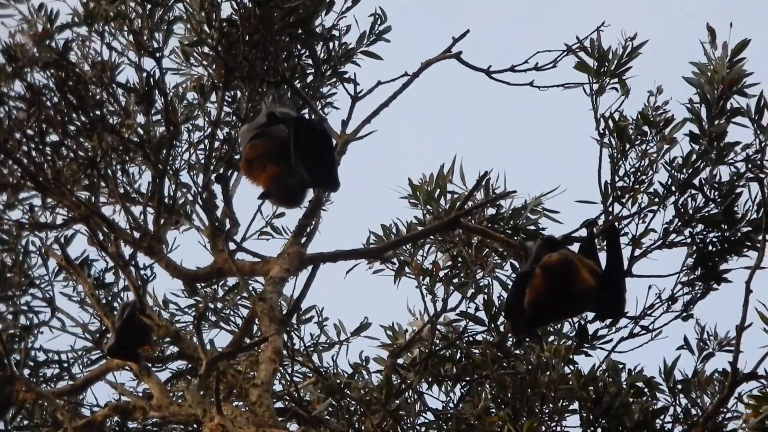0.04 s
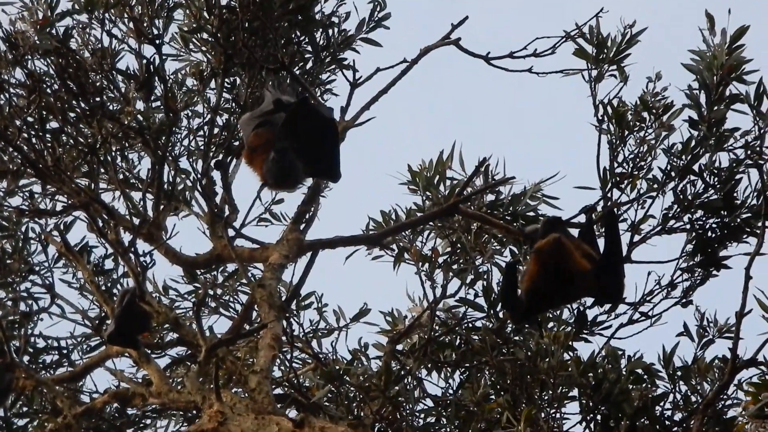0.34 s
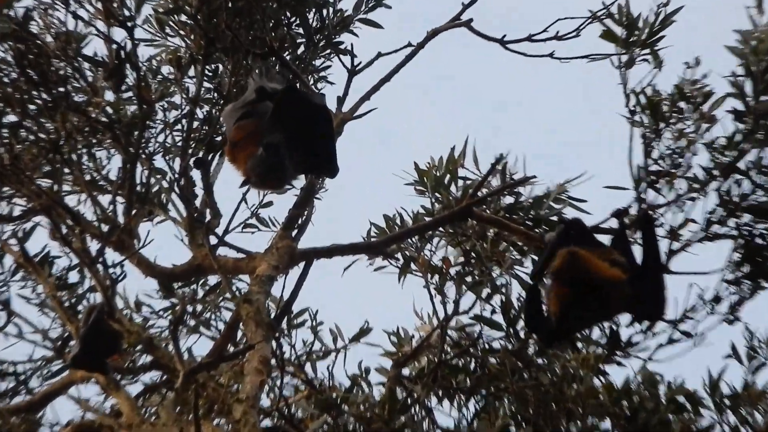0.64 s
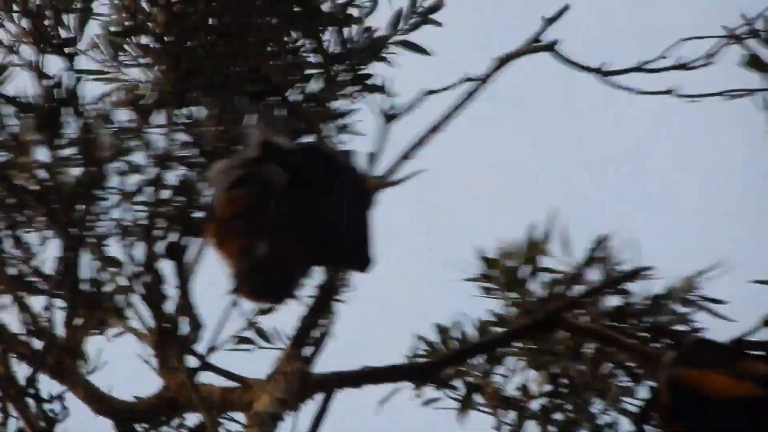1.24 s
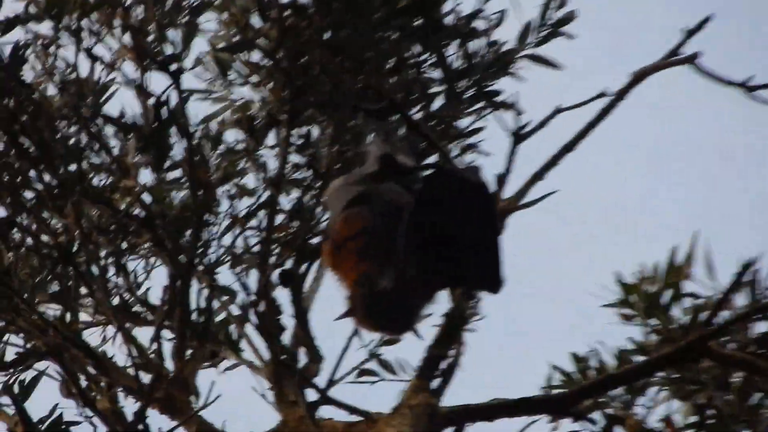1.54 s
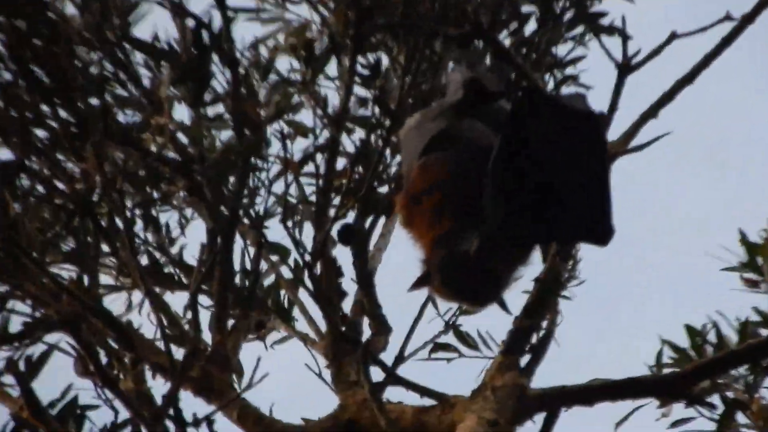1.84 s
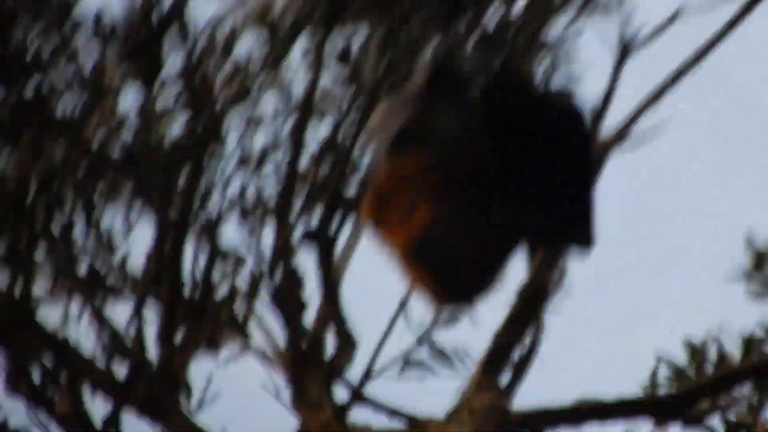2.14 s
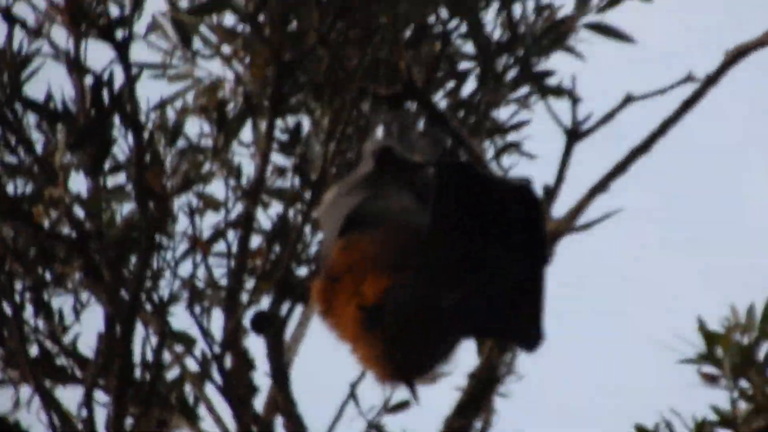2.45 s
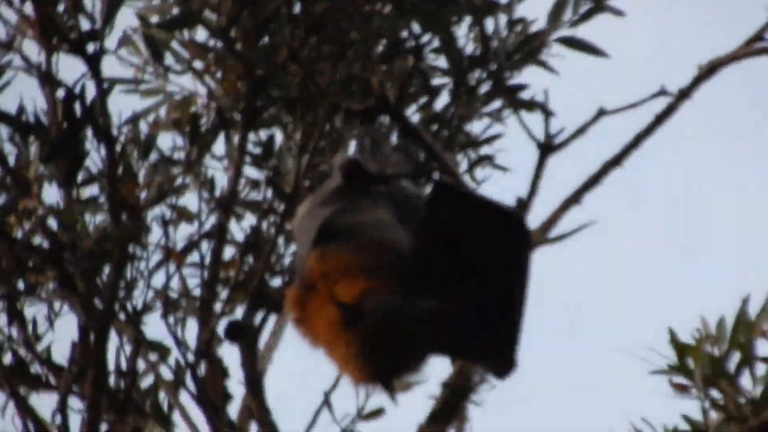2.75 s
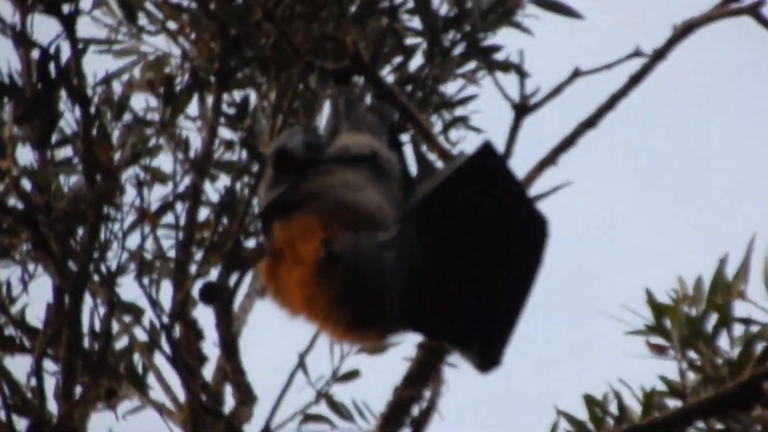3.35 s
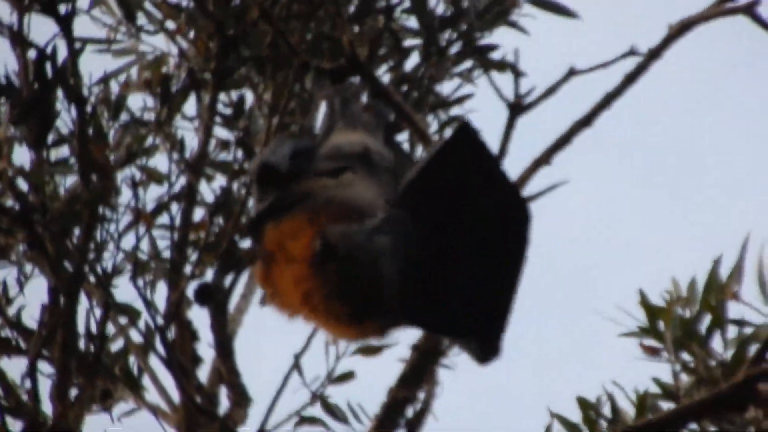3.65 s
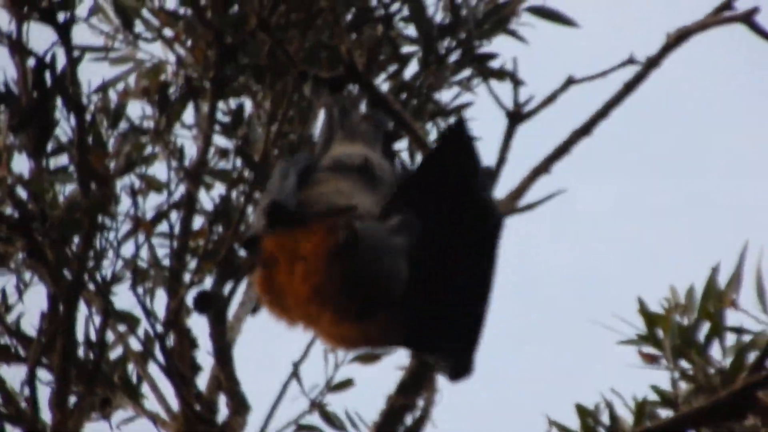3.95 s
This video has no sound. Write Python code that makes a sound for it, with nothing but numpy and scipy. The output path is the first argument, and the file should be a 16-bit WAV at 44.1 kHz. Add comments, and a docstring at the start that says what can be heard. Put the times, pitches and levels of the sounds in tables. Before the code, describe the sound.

Fruit bats squabble in a tree with short, throaty squawks and rasps, then runs of thin rising chirps. A camera clicks sharply twice at the microphone, while faint birds whistle over a low outdoor rumble and steady hiss.

```python
"""Fruit bats squabbling in a tree

Arched, throaty squawks trade with short rasps, then come runs of thin rising chirps.
Birds whistle and trill far off, and the foliage scatters every call.
The camera clicks twice, ringing its shell, and fingers bump it softly.
Underneath sit a low outdoor rumble, a wash of distant calls and a steady high hiss."""
import sys
import numpy as np
from scipy import signal
from scipy.fft import rfft, irfft
from scipy.io import wavfile
from scipy.ndimage import uniform_filter1d

SR = 44100
rng = np.random.default_rng(int(sys.argv[2]) if len(sys.argv) > 2 else 0)


def unload_wav(signal):
    """Save mono or channel-first audio to the path in sys.argv[1] as 16-bit WAV at rate SR, clipped to [-1, 1]."""
    wavfile.write(
        sys.argv[1],
        SR,
        np.round(np.clip(np.atleast_2d(signal).T, -1, 1) * 32767).astype(np.int16),
    )


N = 176400
T = np.arange(N) / SR

# One curve per squawk: (time [s], pitch [Hz], level [dB], roughness [0-1], throat resonance [Hz])
SQUAWKS = [
    [(1.008, 540, -41, .4, 3200), (1.026, 570, -35.5, .15, 2900), (1.047, 550, -37, .2, 2850),
     (1.074, 540, -45, .3, 3100)],
    [(1.157, 420, -36, .6, 3000), (1.172, 497, -32.5, .1, 2950), (1.184, 492, -34, .25, 2850),
     (1.198, 543, -28, .08, 3200), (1.21, 530, -28, .12, 3150), (1.223, 480, -36, .2, 2900)],
    [(1.307, 425, -35.5, .45, 2800), (1.318, 485, -33, .12, 2900), (1.331, 535, -26.5, .08, 3150),
     (1.346, 541, -24.8, .1, 3270), (1.353, 536, -26.5, .15, 3480), (1.363, 505, -29.5, .3, 3330),
     (1.374, 478, -37, .35, 2950)],
    [(1.453, 425, -41, .25, 2600), (1.462, 455, -33.5, .2, 2730), (1.471, 500, -34.5, .15, 3000),
     (1.484, 534, -29, .2, 3400), (1.499, 540, -28, .5, 3500), (1.511, 490, -36, .6, 3100)],
]
# Rasps between the squawks: (start [s], length [s], peak pitch [Hz], peak level [dB])
RASPS = [(1.091, 0.011, 480, -36.5), (1.108, 0.019, 495, -38), (1.257, 0.0073, 503, -33.5),
         (1.265, 0.01, 507, -34), (1.398, 0.031, 524, -34), (1.594, 0.01, 550, -34.5),
         (1.677, 0.047, 474, -44)]
def bats(rasp_roughness=.36, rasp_arch=.06):
    """The squabble: squawks and rough little rasps, each arching in pitch and level."""
    jitter = drift(330)
    breaths = [colour(rng.standard_normal(N), throat) for throat in (THROAT_OPEN, THROAT_CLOSED)]
    rasps = []
    for start, length, hz, db in RASPS:
        rasps.append([(start + length * u, hz * (1 - rasp_arch * sag), db - 4 * sag,
                       rasp_roughness, 6 * hz) for u, sag in ((0, 1), (.5, 0), (1, .75))])
    return sum(bat_call(curve, jitter, breaths) for curve in SQUAWKS + rasps)


# Throat tone with the mouth wide open: (frequency [Hz], gain [dB])
THROAT_OPEN = [(1400, -40.5), (2130, -13), (2600, -13.5), (2980, -1), (3200, 2), (3450, 3), (3750, -7.5),
               (4250, -4), (4800, -18), (6500, -32), (13000, -52)]
# Throat tone with the mouth half closed: (frequency [Hz], gain [dB])
THROAT_CLOSED = [(1400, -28), (2400, -14), (2850, -9), (3200, 1), (3600, -10.5), (4300, -11), (4800, -10.5),
                 (5400, -11.5), (6400, -20), (13000, -48)]
CLOSED_DB, OPEN_DB = -37, -31.5   # call levels between which the mouth opens
JITTER_DEPTH, BREATH_MIX = .07, .65   # at full roughness
def bat_call(curve, jitter, breaths, throat_hz=3200, grain_db=3, edge_s=.005):
    """Jittered harmonics and pulsed breath; the mouth opens as the call grows louder."""
    times, *columns = np.transpose(curve)
    span = (T > times[0] - edge_s) & (T < times[-1] + edge_s)
    t = T[span]
    pitch, level, rough, resonance = (np.interp(t, times, column) for column in columns)
    mouth = np.clip((level - CLOSED_DB) / (OPEN_DB - CLOSED_DB), 0, 1)
    phase = 2 * np.pi * np.cumsum(pitch * (1 + JITTER_DEPTH * rough * jitter[span])) / SR
    harmonic = np.arange(2, 22)[:, None]
    grain = unit(uniform_filter1d(rng.standard_normal((len(harmonic), len(t))), size=400, axis=1))
    place = harmonic * pitch * throat_hz / resonance   # slides the throat's peak to the resonance
    throat_db = mouth * at_hz(THROAT_OPEN, place) + (1.5 - mouth) * at_hz(THROAT_CLOSED, place)
    gains = amp(throat_db + grain_db * grain)
    lag = .65 * harmonic ** 2 + rng.normal(0, .25, harmonic.shape)   # smears each pulse into an upsweep
    voice = (gains * np.cos(harmonic * phase - lag)).sum(0) / np.sqrt((gains ** 2).sum(0) / 2)
    breath = mouth * breaths[0][span] + (1 - mouth) * breaths[1][span]
    air = unit(breath * (1 + .5 * np.cos(phase)))
    gate = np.clip(np.minimum(t - t[0], t[-1] - t) / edge_s / 2 + .5, 0, 1)
    out = np.zeros(N)
    out[span] = unit(voice + BREATH_MIX * rough * air) * gate * amp(level)
    return out


# Runs of chirps: (start [s], starting pitch [Hz], level [dB], overtones and air [dB])
CHIRPS = [(2.596, 4920, -49, -15), (2.643, 4800, -43, -8), (2.692, 4830, -40, -2),
          (2.743, 4550, -37, -13.5), (2.868, 3555, -38, -5), (2.903, 4370, -39.5, -5),
          (2.948, 4076, -32.5, -7), (2.998, 4290, -35, -6.5), (3.046, 4170, -32, -8),
          (3.22, 3494, -46.5, 2), (3.264, 3880, -41, -1), (3.309, 4360, -35.5, -10),
          (3.361, 4344, -33, -15), (3.42, 4430, -36.5, -13), (3.579, 3480, -44.5, -13),
          (3.621, 4140, -41, -7), (3.672, 4320, -36, -8), (3.722, 4297, -32.5, -9.5),
          (3.776, 4050, -37.5, -25)]
# Scratch of air in a chirp: (frequency [Hz], gain [dB])
SCRATCH = [(1500, -25), (2600, -9.5), (3400, -12), (5000, 5), (6300, -10), (8500, 7.5), (11500, 2),
           (14000, -16)]
def chirps(length_s=.033, attack_s=.009, glide_s=.026, waver_depth=.014, rasp_depth=.6, rasp_hz=450):
    """Quick raspy upward sweeps with two overtones, levelling off towards a top pitch."""
    out, t = np.zeros(N), T[:int(length_s * SR)]
    envelope = np.minimum(t / attack_s, (length_s - t) / (length_s - attack_s))
    waver = drift(530)
    air = amp(-1) * colour(rng.standard_normal(N), SCRATCH)
    lowpass = signal.butter(4, rasp_hz, fs=SR, output="sos")
    rasp = unit(signal.sosfilt(lowpass, rng.standard_normal(N)))
    for start, hz, db, overtone_db in CHIRPS:
        span = slice(int(start * SR), int(start * SR) + len(t))
        top_hz = np.interp(hz, [3485, 4120], [4470, 6200])   # the low chirp opening a run rises less
        pitch = top_hz + (hz - top_hz) * np.exp(-t / glide_s)
        phase = 2 * np.pi * np.cumsum(pitch * (1 + waver_depth * waver[span])) / SR
        edge = np.sin(2 * phase) + amp(-11) * np.sin(3 * phase) + air[span]
        tone = np.sin(phase) + amp(overtone_db) * edge
        add(out, start, amp(db) * envelope * np.sqrt(2) * tone * unit(1 + rasp_depth * rasp[span]))
    return out


# Camera clicks: (time [s], level [dB], snap left over right [dB], shell ring [dB])
CLICKS = [(1.0076, -14, 4, -0.5), (1.915, -9.5, -6.5, -0.5)]
# Contacts within a click: (time offset [s], level [dB])
CONTACTS = [(-.0019, -6.5), (-.0009, -12), (0, -1.5), (.0009, -10.5)]
# Bright snap of a contact: (frequency [Hz], gain [dB])
SNAP = [(500, -26), (2000, -5), (5000, -17.5), (7700, 6), (11000, -7), (15500, -18)]
# Modes of the shell: (frequency [Hz], level [dB], 60 dB decay time [s])
SHELL_MODES = [(950, -15, 0.017), (1500, -46, 0.011), (2350, -19, 0.025), (3240, -17.5, 0.015),
               (5400, -26, 0.0076), (7300, -33, 0.0056), (7300, -35, .006), (10500, -26, .005)]
def camera_clicks(snap_db=-1, snap_decay_s=.00062, shell_pan_db=2):
    """Four quick contacts snap; the main one rings the camera's shell."""
    out, t = np.zeros((2, N)), T[:SR // 20]
    ring = sum(amp(db - 60 * t / t60) * np.sin(2 * np.pi * hz * t) for hz, db, t60 in SHELL_MODES)
    for start, db, pan_db, ring_db in CLICKS:
        for offset, contact_db in CONTACTS:
            noise = widen(*rng.standard_normal((2, len(t))), side_db=-7)
            snap = colour(noise, SNAP) * np.exp(-t / snap_decay_s)
            add(out, start + offset, amp(db + contact_db + snap_db) * snap * pan(pan_db))
        add(out, start, amp(db + ring_db) * ring * pan(shell_pan_db))
    return out


# Soft handling bumps: (time [s], level [dB], centre frequency [Hz])
BUMPS = [(0.257, -48, 1270), (.549, -49, 520), (2.373, -41, 730), (2.544, -51, 1280)]
def finger_bumps(attack_s=.00071, decay_s=.008, gain_db=7):
    """Dull knocks of fingers on the camera."""
    out, t = np.zeros(N), T[:SR // 10]
    envelope = np.minimum(t / attack_s, 1) * np.exp(-t / decay_s)
    for start, db, hz in BUMPS:
        band = [(hz / 6, -20), (hz * .59, -6), (hz, 0), (hz * 1.54, -11), (hz * 4, -40)]
        thud = colour(rng.standard_normal(len(t)), band)
        add(out, start, amp(db + gain_db) * thud * envelope)
    return out


# Far whistles: (start [s], length [s], first pitch [Hz], last pitch [Hz], level [dB])
WHISTLES = [(0.627, 0.065, 2400, 2240, -50), (1.839, .13, 3110, 3610, -48.5),
            (2.255, 0.074, 3000, 3236, -47.5), (2.583, 0.22, 6950, 6560, -46.5)]
TRILL_START_S, TRILL_LENGTH_S, TRILL_HZ, TRILL_DB = 1.53, .43, 6150, -48
def far_birds(whistle_waver=.016, trill_waver=.0331):
    """Faint gliding whistles and one wavering trill, each a sine that swells and fades."""
    out, waver = np.zeros(N), drift(130)
    notes = [(*whistle, whistle_waver) for whistle in WHISTLES]
    notes.append((TRILL_START_S, TRILL_LENGTH_S, TRILL_HZ, TRILL_HZ, TRILL_DB, trill_waver))
    for start, length, first_hz, last_hz, db, depth in notes:
        u = np.linspace(0, 1, int(length * SR))
        glide = last_hz + (first_hz - last_hz) * (1 - u) ** 2
        pitch = glide * (1 + depth * waver[int(start * SR):][:len(u)])
        swell = np.sqrt(4 * u * (1 - u))
        add(out, start, amp(db) * swell * np.sin(2 * np.pi * np.cumsum(pitch) / SR))
    return out


def foliage(send, t60_s, build_s=.0042):
    """Diffuse stereo echoes from leaves and branches."""
    t = T[:SR]
    envelope = amp(-60 * t / t60_s) * (1 - np.exp(-t / build_s))
    mid, side = rng.standard_normal((2, SR)) * envelope
    tail = unit(widen(mid, side, side_db=-4)) / np.sqrt(SR)
    return signal.fftconvolve(send[None], tail, axes=1)[:, :N]


# Tone of the rumble, the wash and the hiss: (frequency [Hz], gain [dB])
RUMBLE_TONE = [(20, -8.5), (35, -7), (60, -1), (88, 4), (115, -3), (180, -5.5), (290, -9.5), (480, -20),
               (950, -24), (1400, -32.5), (3000, -29), (6000, -31), (15000, -42.5)]
WASH_TONE = [(1500, -10.5), (2300, 4), (2750, 5.5), (3500, -6.5), (4400, 4), (6000, -40)]
HISS_TONE = [(2000, -45), (5500, -13), (6900, -5.5), (7850, 7.5), (8900, -2), (11600, 0.5), (12800, -3.5),
             (14200, -17), (15500, -46)]
# Their fader rides: (time [s], level [dB])
RUMBLE_RIDE = [(0, -43), (1.75, -44), (2, -48.5), (2.25, -42.5), (2.5, -44.5), (4, -45)]
WASH_RIDE = [(0, -66), (.8, -53), (2.1, -56.5), (2.7, -72), (3.1, -54.5), (4, -56.5)]
HISS_RIDE = [(0, -57), (1.7, -51.5), (2, -55.5), (2.25, -52.5), (3.3, -49.5), (4, -52)]
def ambience(hiss_gain_db=5):
    """Low outdoor rumble, a wash of distant calls and the camera's high hiss."""
    hiss_gain = amp(hiss_gain_db) * fader(HISS_RIDE, flutter_db=2.04, rate_hz=9.8)
    rumble = fader(RUMBLE_RIDE, flutter_db=1, rate_hz=8.8) * noise_bed(RUMBLE_TONE)
    wash = fader(WASH_RIDE, flutter_db=2, rate_hz=6.1) * noise_bed(WASH_TONE)
    hiss = hiss_gain * noise_bed(HISS_TONE)
    return rumble * pan(1.64) + wash + hiss * pan(-4)


# Stereo image of the beds: (frequency [Hz], left-right correlation [-1 to 1])
BED_IMAGE = [(60, 0.99), (250, 0.8), (1000, 0.47), (3000, 0.86), (7000, 0.72), (12000, -0.2)]
def noise_bed(tone):
    """Coloured noise, nearly mono in the bass and wide at the very top."""
    mid, side = rfft(rng.standard_normal((2, N)))
    likeness = at_hz(BED_IMAGE, np.fft.rfftfreq(N, 1 / SR))
    spectrum = widen(np.sqrt(1 + likeness) * mid, np.sqrt(1 - likeness) * side)
    return colour(irfft(spectrum, N), tone)


def fader(ride, flutter_db, rate_hz):
    """Gain that follows a level curve, with a random flutter."""
    return amp(np.interp(T, *np.transpose(ride)) + flutter_db * drift(rate_hz))


def drift(rate_hz):
    """Smooth random wander at rms 1."""
    pole = np.exp(-2 * np.pi * rate_hz / SR)
    return unit(signal.lfilter([1], [1, -2 * pole, pole * pole], rng.standard_normal(N + SR))[SR:])


def colour(x, tone):
    """EQ a signal with a tone curve; rms 1."""
    n = x.shape[-1]
    gains = amp(at_hz(tone, np.fft.rfftfreq(n, 1 / SR)))
    return unit(irfft(rfft(x) * gains, n))


def at_hz(curve, hz):
    """Read a curve on a log-frequency axis."""
    freqs, values = np.transpose(curve)
    return np.interp(np.log(np.maximum(hz, 1)), np.log(freqs), values)


def amp(db):
    """Decibels to gain."""
    return 10 ** (np.asarray(db) / 20)


def unit(x):
    """Scale to rms 1."""
    return x / np.sqrt(np.mean(x ** 2) + 1e-20)


def pan(db):
    """Stereo gains; positive leans left."""
    return amp([[db / 2], [-db / 2]])


def widen(mid, side, side_db=0):
    """Mid and side to left and right."""
    return mid + amp(side_db) * side * [[1], [-1]]


def add(out, start_s, x):
    """Mix a sound in at its cue."""
    i = max(int(start_s * SR), 0)
    out[..., i:i + x.shape[-1]] += x[..., :N - i]


def scene():
    """Squawks up front, chirps and birds deeper in the trees, camera noises and ambience."""
    squabble, chirping, birds = bats(), chirps(), far_birds()
    direct = squabble * pan(1.6) + amp(-2) * chirping * pan(.3) + birds
    tree_echoes = foliage(amp(-14) * squabble + amp(-3) * chirping + amp(-1) * birds, t60_s=.58)
    near_leaves = foliage(amp(-14) * squabble + chirping, t60_s=.2)
    return direct + tree_echoes + near_leaves + camera_clicks() + finger_bumps() + ambience()


CUTOFF_HZ = 15800
def record(dry):
    """A steep low-pass takes off the very top."""
    return signal.sosfilt(signal.ellip(10, .1, 80, CUTOFF_HZ, fs=SR, output="sos"), dry)


dry = scene()
out = record(dry)
unload_wav(out)
```